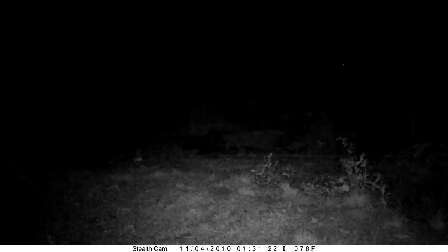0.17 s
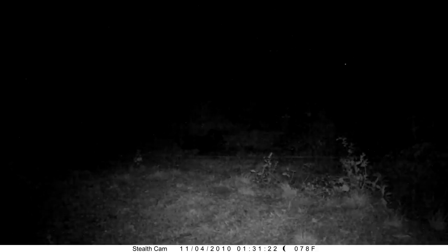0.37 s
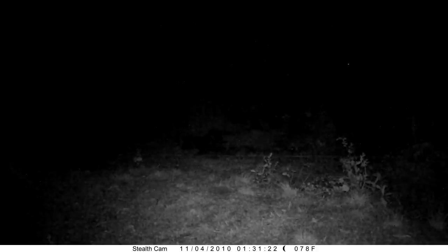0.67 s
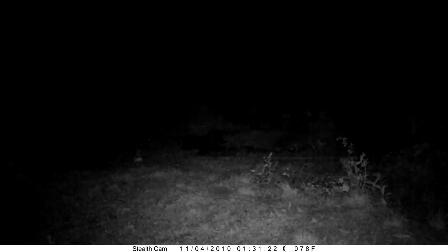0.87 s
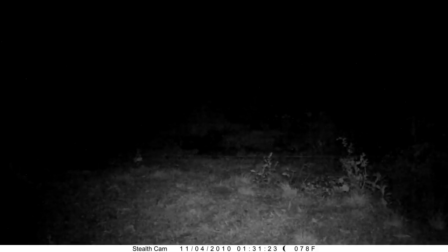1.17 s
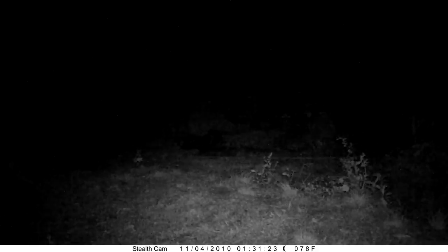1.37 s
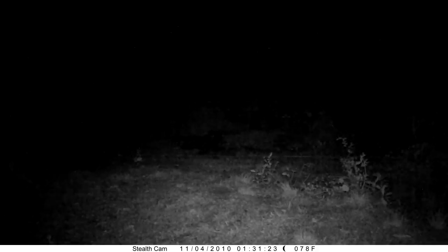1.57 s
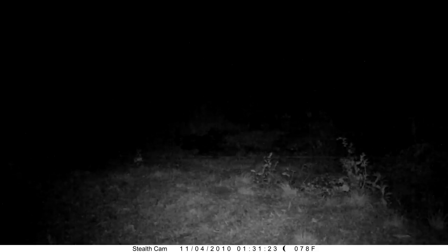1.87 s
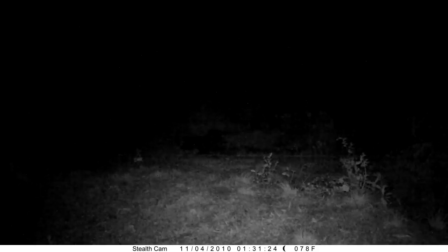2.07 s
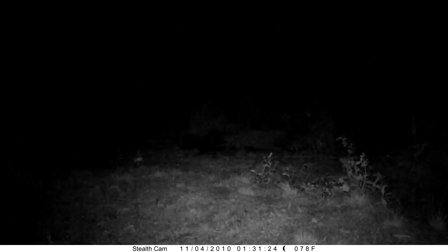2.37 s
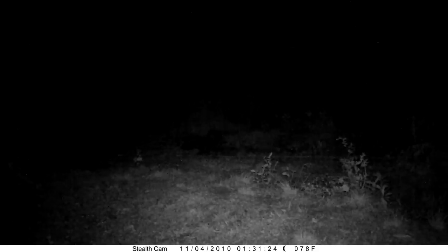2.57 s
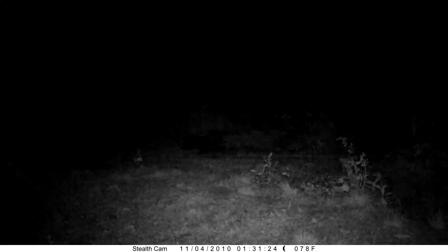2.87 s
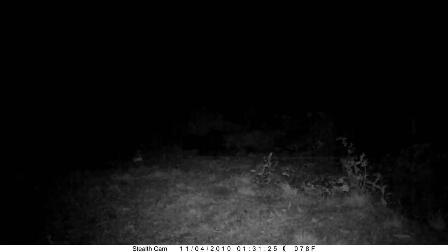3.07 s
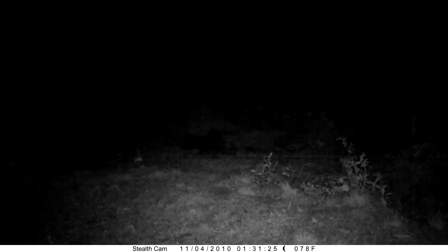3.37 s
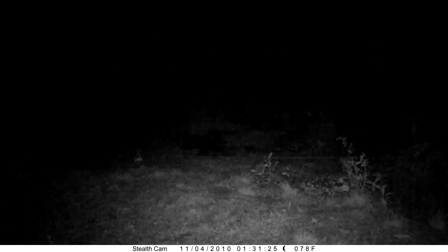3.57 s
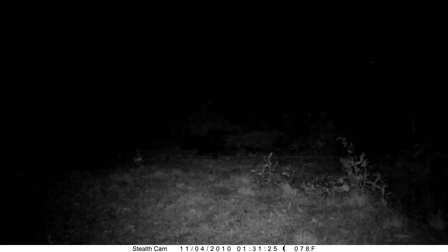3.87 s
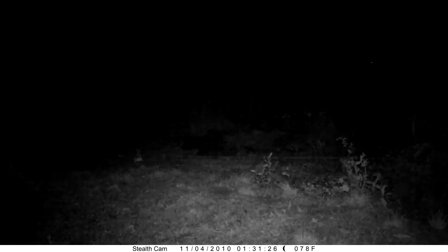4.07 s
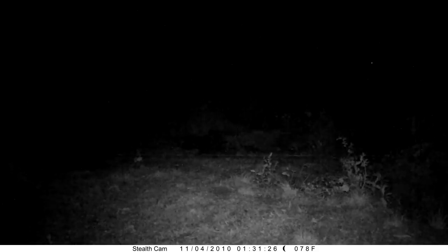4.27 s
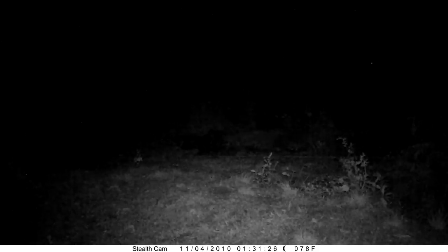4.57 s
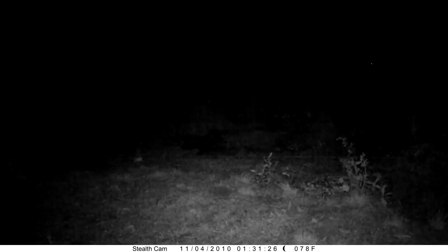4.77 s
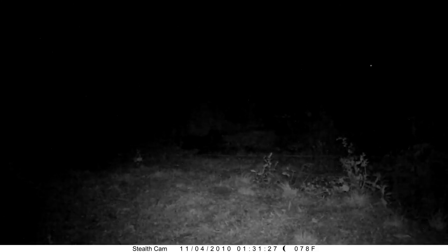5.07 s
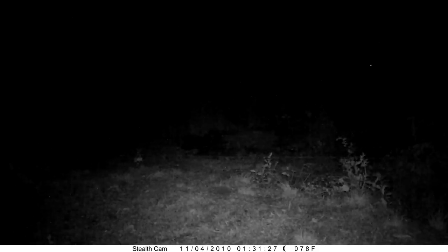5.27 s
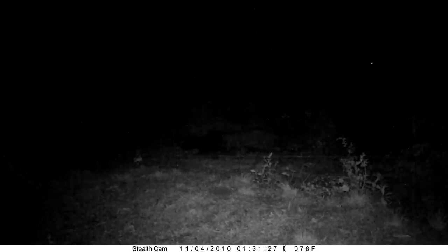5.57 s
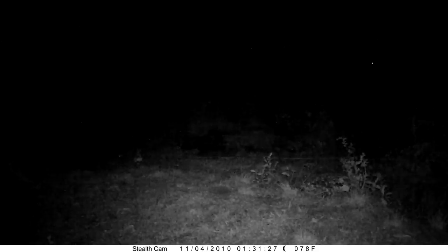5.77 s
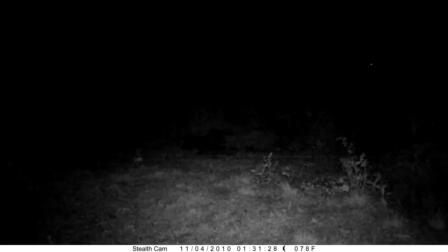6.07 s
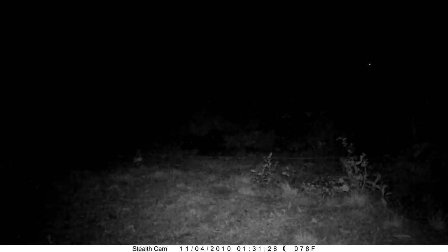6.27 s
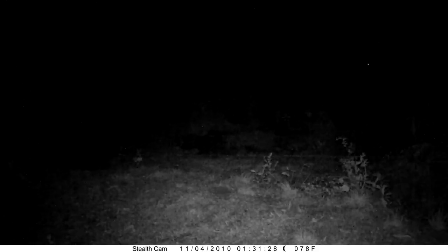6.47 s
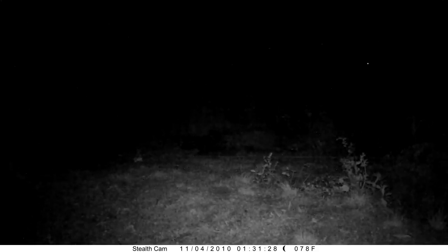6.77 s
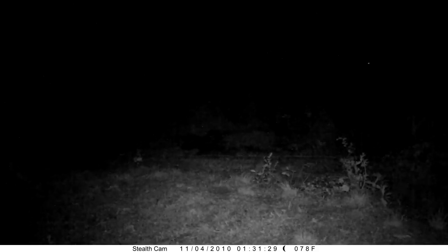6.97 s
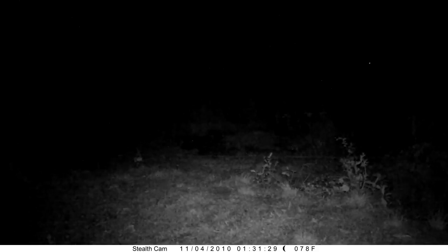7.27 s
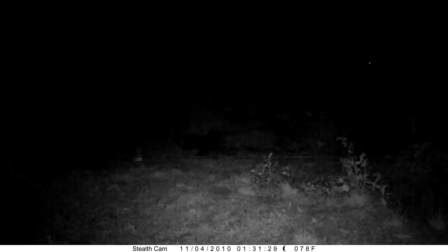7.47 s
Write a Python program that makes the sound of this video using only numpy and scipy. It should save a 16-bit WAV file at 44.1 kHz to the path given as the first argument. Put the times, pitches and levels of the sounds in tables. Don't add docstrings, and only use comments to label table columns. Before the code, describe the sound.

Throughout about 7.6 seconds, a dense night insect chorus shimmers over open grassland, with steady trills near 2 kHz and brighter layers around 5 and 7.5 kHz above a soft air wash. A high bush cricket rasps in brief swelling phrases roughly twice a second, while another gives a thin buzz about once a second. A field cricket chirps from 0.7 to 4 seconds, strongest around 3.5 and 3.9. Small hollow taps tick at 0.5, 1.1 and 1.3-1.5 seconds amid faint dry rustling. From 4.7 to 5.9 the grass crackles more, with soft low thuds and clustered taps near 5 and 5.6. A stalk snaps sharply at 6.1, then another, louder, at 6.4, each with a brief splintery tail. The highest chorus dips slightly near 7 seconds; rustling and one tap follow around 7.3. The small microphone sounds centred, gritty and dull at the very top.

```python
import sys
import numpy as np
from scipy import signal
from scipy.fft import rfft, irfft, next_fast_len
from scipy.io import wavfile
from scipy.ndimage import uniform_filter1d, map_coordinates

SR = 44100
rng = np.random.default_rng(int(sys.argv[2]) if len(sys.argv) > 2 else 0)


def materialize(psi):
    bounded = np.clip(np.atleast_2d(psi).T, -1, 1)
    quanta = np.round(bounded * 32767).astype(np.int16)
    wavfile.write(sys.argv[1], SR, quanta)


def gain_from_db(level_db):
    decades = np.asarray(level_db, float) / 20
    return 10 ** decades


N = 336527

# f/Hz, level/dB [per Hz]
NIGHT_AIR = [(25, -11), (100, -9), (1000, -11.5), (1250, -8.5), (2500, 4.5), (2900, -2.5), (3500, -5),
             (4400, 5), (5500, 0.5), (6600, 5), (8300, 4), (8700, -7), (10500, -16), (12500, -16)]
# f/Hz, spread/Hz, strokes per second [1/s], stroke length/s, level/dB
CHOIRS = [(1430.3, 76.6, 300, 0.024, -65), (1736, 13, 150, 0.053, -71), (2121, 118.4, 500, 0.018, -52.5),
          (4896, 170, 1200, .008, -53), (5990, 230, 970, 0.0099, -63), (7495, 324, 1200, 0.0083, -54.5)]
# t/s, level/dB
HIGH_CHOIR_SWELL = [(0, 1.5), (2, 1.5), (4, 1.5), (5, 3), (6.3, 2), (6.7, -3.5), (7.2, -3.5), (7.63, 0)]
# f/Hz, strokes per second [1/s], stroke length/s, level/dB
LONE_SINGERS = [(2048, 70.8, .009, -54), (2203, 80.4, 0.0083, -54.5), (4918, 67, 0.0075, -60.5),
                (1295, 44, 0.017, -77)]
# t/s, hold/s, level/dB
RASP_PHRASES = [(-.1, 0.064, -61.5), (0.237, .02, -55.5), (0.658, 0.12, -56), (1.145, 0.042, -56),
                (1.713, 0.089, -56), (2.288, 0.091, -56.5), (2.737, 0.032, -56.5), (3.033, .06, -61),
                (3.151, .06, -57), (3.512, 0.036, -60.5), (3.783, 0.063, -58), (4.228, 0.043, -56.5),
                (4.578, 0.064, -59.5), (4.683, 0.088, -57.5), (5.125, 0.066, -56), (5.616, 0.033, -56.5),
                (5.953, 0.076, -60.5), (6.87, 0.037, -54.5), (7.292, .1, -56)]
BUZZ_HOLD_S = [0.17, .1, 0.11, .05, 0.11, 0.11, 0.14]
# t/s, length/s, peak level/dB, first f/Hz
CHIRPS = [
    (0.652, .14, -46.5, 4220),
    (1.175, .09, -60, 4330),
    (1.456, .14, -46, 4230),
    (1.761, .14, -48, 3840),
    (2.088, .19, -45, 3840),
    (2.49, .14, -48, 3820),
    (3.246, .14, -53, 3860),
    (3.541, .19, -43, 4015),
    (3.915, .19, -41.5, 3980),
]
# t/s, hold/s, blades level/dB, thuds level/dB, seed heads level/dB
STIRRINGS = [(-.1, 0.055, -59, -86, -63), (0.443, .4, -69.5, -87.5, -88.5), (1.296, 0.25, -67, -92, -77.5),
             (1.96, .12, -70, -87, -62.5), (4.744, 0.14, -64, -78.5, -56), (4.894, 0.22, -56.5, -73.5, -77),
             (5.331, 0.045, -57.5, -75, -79), (5.499, 0.17, -66.5, -70.5, -87), (5.76, .2, -69, -78.5, -74),
             (6.442, 0.16, -63.5, -81.5, -63), (7.233, .1, -66, -70, -78), (7.33, 0.041, -59, -67, -76)]
STILL_DB = (-71, -87.5, -78)
# f/Hz, level/dB [per Hz]
BLADE_COLOUR = [(500, -14), (900, -2.5), (1500, -0.5), (3200, -1.5), (6000, -10.5), (9000, -12.5),
                (12500, -18)]
# f/Hz, level/dB [per Hz]
SEED_COLOUR = [(1500, -38), (3000, -17), (6000, -5.5), (9000, 1), (11500, -2.5), (12500, -5.5)]
# f/Hz, level/dB [per Hz]
THUD_COLOUR = [(30, -9), (120, -1.5), (300, -2), (500, -6), (800, -40)]
# t/s, peak level/dB, f/Hz
KNOCKS = [(0.472, -53, 1070), (1.11, -44, 1010), (1.346, -44, 1010), (1.466, -53.5, 1100),
          (4.912, -82, 1006), (4.976, -47.5, 880), (5.039, -43.5, 950), (5.126, -56, 1020),
          (5.172, -57, 1180), (5.565, -47.5, 860), (5.598, -47, 830), (7.355, -44, 1120)]
# t/s, level/dB, time to fall 60 dB/s, hollow f/Hz
SNAPS = [
    (6.104, -50.5, 0.11, 201),
    (6.1103, -39.5, 0.42, 193),
    (6.4073, -35, 0.5, 254),
    (6.464, -55.5, 0.5, 253),
]
# f/Hz, level/dB [per Hz]
SPLINTER_COLOUR = [(24, -50), (40, -19), (266, -9), (522, -13.5), (1400, -2), (1690, -8.5), (2000, -3.5),
                   (4750, -2), (5230, -3), (10700, -10), (12400, -17), (16100, -48), (22000, -120)]
# f/Hz, level/dB
FINEST_STEPS = [(170, -51), (700, -46), (1050, -37), (1400, -20), (1600, -21), (1750, -12), (2300, -12),
                (2600, -16), (3000, -19.5), (3500, -19), (3800, -16), (5200, -14), (8300, -15.5),
                (9000, -18), (9700, -27), (10300, -31)]


def along(points, hz):
    f, v = np.transpose(points)
    return np.interp(np.log(hz + 1), np.log(f + 1), v)


def wobble(rate):
    return map_coordinates(rng.standard_normal(int(N * rate / SR) + 4), [np.arange(N) * rate / SR], order=1)


def coloured(x, gain):
    m = next_fast_len(len(x) + 8192)
    spectrum = rfft(x, m) * gain(np.fft.rfftfreq(m, 1 / SR))
    y = irfft(spectrum, m)[:len(x)]
    return y / np.std(y)


def hiss(colour, size=N):
    return coloured(rng.standard_normal(size), lambda hz: gain_from_db(along(colour, hz)))


def scattered(x, t60, wet_db):
    t = np.arange(SR // 4) / SR
    tail = rng.standard_normal(len(t)) * gain_from_db(-60 * t / t60)
    tail /= np.linalg.norm(tail)
    y = x + gain_from_db(wet_db) * signal.oaconvolve(x, tail)[:len(x)]
    return y / np.std(y)


def phrases(start, hold, db, swell, swell_db, fade_db):
    t = np.arange(0, N + 64, 64) / SR - np.asarray(start)[:, None]
    swelling = -swell_db * np.clip(1 - t / swell, 0, 1)
    fading = -fade_db * np.maximum(t - swell - np.abs(hold)[:, None], 0)
    onset = np.clip(t / 0.013, 0, 1)
    gain = (gain_from_db(np.asarray(db)[:, None] + swelling + fading) * onset).max(axis=0)
    return np.interp(np.arange(N) / 64, np.arange(len(gain)), gain)


def strokes(s, hz, size, length, glide, rise=0.61):
    u = np.arange(round(length * SR)) / (length * SR)
    start = np.floor(s * SR)
    t = u * length - (s - start / SR)[:, None]
    sagging = 1 + glide * (.5 - u / 2)
    tones = np.sin(2 * np.pi * hz[:, None] * t * sagging)
    tones = tones * np.sin(np.pi * u ** rise) * size[:, None]
    where = start.astype(int)[:, None] + np.arange(len(u))
    return np.bincount(where.ravel(), tones.ravel(), N + SR)[:N]


def trill(hz, rate, length, glide, slip=.0001, drift=.004):
    draw = rng.standard_normal((int(N / SR * rate * 1.1), 3))
    slow = uniform_filter1d(draw[:, 0], size=25) * 5
    s = np.cumsum((1 + drift * slow) / rate) + slip * draw[:, 1]
    keep = (s > 0) & (s < N / SR)
    return strokes(s[keep], np.full(keep.sum(), hz), gain_from_db(0.5 * draw[keep, 2]), length, glide)


def night_air():
    return gain_from_db(-55.5) * hiss(NIGHT_AIR)


def choirs():
    s, db = np.transpose(HIGH_CHOIR_SWELL)
    pause_db = np.interp(np.arange(N) / SR, s, db)
    shares = [0, 0.11, 0.0, 0.049, 0.0, 0.94]
    out = np.zeros(N)
    for (hz, spread_hz, rate, length, db), share in zip(CHOIRS, shares):
        when, chance_a, chance_b = rng.random((int(rate * N / SR), 3)).T
        pitch = hz + spread_hz * np.sqrt(6) * (chance_a + chance_b - 1)
        crowd = strokes(when * N / SR, pitch, np.ones(len(when)), length, glide=0.035)
        out += gain_from_db(db + share * pause_db + 0.18 * wobble(3.3)) * crowd / np.std(crowd)
    return out


def lone_singers():
    out = np.zeros(N)
    for hz, rate, length, db in LONE_SINGERS:
        song = scattered(trill(hz, rate, length, glide=0.025), 0.043, wet_db=-5.5)
        out += gain_from_db(db + 1.4 * wobble(3.3)) * song
    return out


def rasping_bush_cricket():
    rasp = np.zeros(N)
    for hz, rate in [(9600, 240), (9960, 118), (9690, 68)]:
        rasp += trill(hz, rate, 0.0045, glide=0.0064, slip=0.000205, drift=0.025)
    mirror = lambda hz: np.exp(-((hz - 9790) / 400) ** 4)
    song = coloured(scattered(rasp, 0.08, wet_db=-9.5), mirror)
    return phrases(*np.transpose(RASP_PHRASES), swell=.08, swell_db=7, fade_db=83.5) * song


def buzzing_bush_cricket():
    first_s, every_s, level_db = .69, 1.104, -63
    t = np.arange(N) / SR
    phrase = np.zeros(N)
    for i, hold in enumerate(BUZZ_HOLD_S):
        s = first_s + every_s * i
        rise, fall = (t - s) / 0.027, (s + hold - t) / 0.078 + 1
        phrase += np.clip(np.minimum(rise, fall), 0, 1)
    buzz = trill(8920, 264, .0016, glide=0, slip=.00001, drift=.002)
    return gain_from_db(level_db) * phrase * scattered(buzz, .05, wet_db=-6)


def field_cricket():
    gap_s, climb_hz, uneven_db = .046, 72, 1.5
    start, length, peak_db, first_hz = np.transpose(CHIRPS)[..., None]
    k = np.arange(5)
    chance = rng.standard_normal((len(CHIRPS), 5, 2))
    sung = (k + .5) * gap_s < length
    s = (start + k * gap_s)[sung]
    hz = (first_hz + climb_hz * (k + chance[..., 0]))[sung]
    size = gain_from_db((peak_db + uneven_db * chance[..., 1])[sung] - 9.5)
    dry = np.zeros(N)
    for late, detune in [(0, 1.03), (.006, .97)]:
        dry += strokes(s + late, hz * detune, size, 0.016, glide=0.087)
    return np.std(dry) * scattered(dry, .15, wet_db=4)


def grass():
    s, hold, *levels = np.transpose(STIRRINGS)
    rustle, thump, rattle = [gain_from_db(still) + phrases(s, hold, db, swell=.06, swell_db=7, fade_db=77)
                             for db, still in zip(levels, STILL_DB)]
    grains = rng.standard_normal(N) * gain_from_db(2.5 * wobble(300) + 2.6 * wobble(30))
    blades = coloured(grains, lambda hz: gain_from_db(along(BLADE_COLOUR, hz)))
    seeds = coloured(grains, lambda hz: gain_from_db(along(SEED_COLOUR, hz)))
    thuds = gain_from_db(2 * wobble(28) - 3.5) * hiss(THUD_COLOUR)
    return rustle * blades + rattle * seeds + thump * thuds


def knocks():
    s, db, hz = np.transpose(KNOCKS)
    return strokes(s, hz, gain_from_db(db - 6), 0.0072, glide=0.042, rise=0.33)


def stalks():
    body_colour = [(20, -6.5), (60, -14), (130, -10.0), (260, -3.0), (400, 0.5), (560, -6), (800, 2), (1600, -19.5)]
    thin = lambda hz: gain_from_db(along(SPLINTER_COLOUR, hz)) * hz ** 2 / (hz ** 2 + 800 ** 2)
    out = np.zeros(N + SR)
    t = np.arange(SR // 2) / SR
    for s, db, t60, hz in SNAPS:
        uneven_db = 1.7 * wobble(160)[:len(t)] * np.clip(t / .03, 0, 1)
        splinters = gain_from_db(uneven_db - 60 * t / t60)
        crack = 1.7 * gain_from_db(-60 * t / 0.028)
        fall = (splinters + crack) * (1 - np.exp(-t / 0.00078))
        body = gain_from_db(-2.0 - 60 * t / 0.045) * hiss(body_colour, size=len(t))
        hollow = gain_from_db(-3 - 60 * t / 0.046) * np.sin(2 * np.pi * hz * t) * (1 - np.exp(-t / 0.0012))
        noise = coloured(rng.standard_normal(len(t)), thin)
        out[round(s * SR):][:len(t)] += gain_from_db(db) * (fall * noise + body + hollow)
    return out[:N]


def scene():
    insects = choirs() + lone_singers() + rasping_bush_cricket() + buzzing_bush_cricket() + field_cricket()
    mono = night_air() + insects + grass() + knocks() + stalks()
    return np.array([mono, mono])


def thinned(x, margin_db, slope_db, scatter_db, empty_db):
    hop, bins, lead = 1024, 561, 1024 - 392
    window = signal.windows.kaiser_bessel_derived(2 * hop, 4 * np.pi)
    phase = np.outer(np.arange(2 * hop) + (hop + 1) / 2, np.arange(bins) + .5)
    basis = window[:, None] * np.cos(np.pi / hop * phase)
    halves = np.pad(x, (lead, 2 * hop - (N + lead) % hop)).reshape(-1, hop)
    z = np.hstack([halves[:-1], halves[1:]]) @ basis
    edge = np.r_[0:40:4, 40:96:8, 96:144:12, 144, 160, 176, 196, 216, 240, 264, 292, 320:bins:32, bins]
    hz, width = edge[:-1] * SR / (2 * hop), np.diff(edge)
    level = 10 * np.log10(np.add.reduceat(z ** 2, edge[:-1], axis=1) / width + 1e-20)
    steady = uniform_filter1d(level, size=3, axis=0)
    level = np.minimum(level, np.roll(level, 1, axis=0) + 9)
    climb = slope_db * np.log2(hz + 100) + 300 * np.log2(np.minimum(hz, 9600) + 100)
    hiding = np.minimum(steady, level + 2) - margin_db
    shadow = np.maximum.accumulate(hiding + climb, axis=1) - climb
    uneven = 2 * uniform_filter1d(rng.standard_normal(level.shape), size=4, axis=0)
    step_db = np.maximum(shadow, along(FINEST_STEPS, hz)) + scatter_db * uneven
    step = np.repeat(gain_from_db(step_db), width, axis=1)
    coarse = np.sign(z) * np.floor(abs(z / step) ** .75 + .4054) ** (4 / 3) * step
    coarse *= np.repeat((steady > step_db - empty_db) | (hz < 10000), width, axis=1)
    frames = coarse @ basis.T * (2 / hop)
    early = np.pad(frames[:, :hop], ((0, 1), (0, 0)))
    late = np.pad(frames[:, hop:], ((1, 0), (0, 0)))
    return (early + late).ravel()[lead:lead + N]


def band_limit(x):
    return signal.sosfilt(signal.butter(12, 12550, fs=SR, output="sos"), x)


def record(dry):
    squeezed = dry[0] / (1 + abs(dry[0] / .09) ** 3) ** (1 / 3)
    thin = thinned(squeezed, margin_db=3, slope_db=36, scatter_db=.7, empty_db=9.5)
    return band_limit(np.array([thin, thin]))


dry = scene()
out = record(dry)
materialize(out)
```